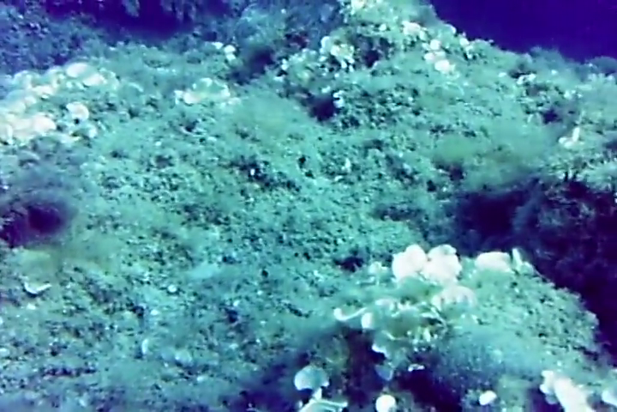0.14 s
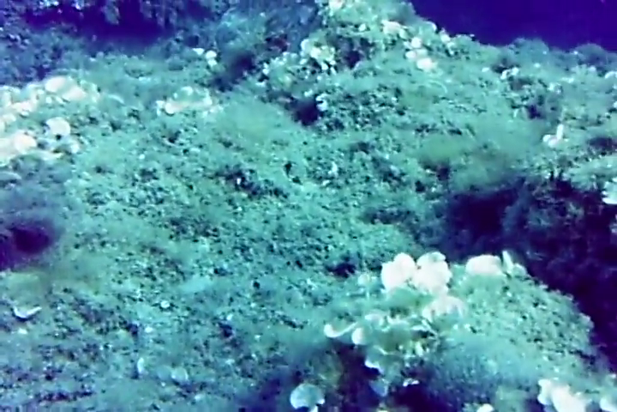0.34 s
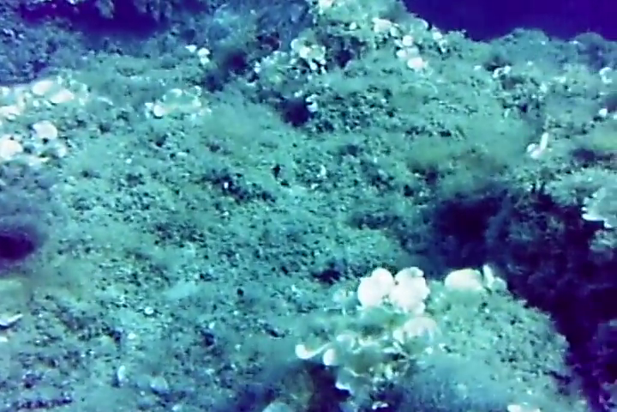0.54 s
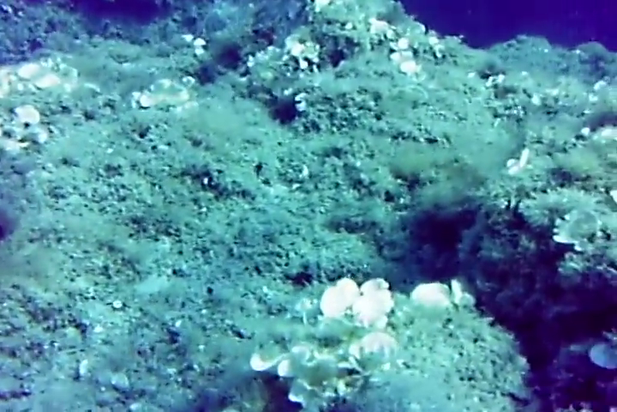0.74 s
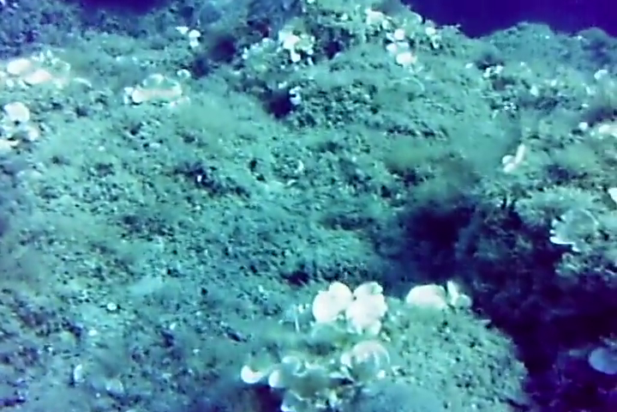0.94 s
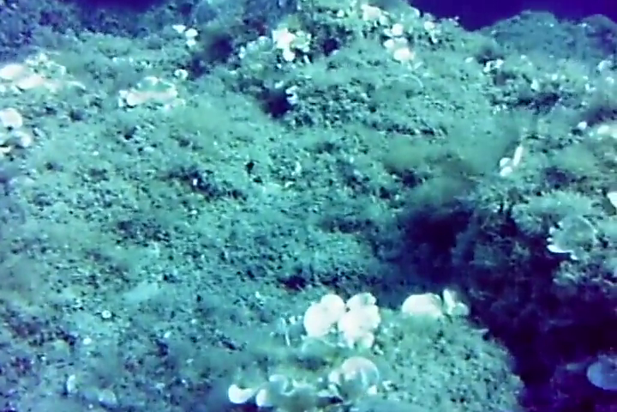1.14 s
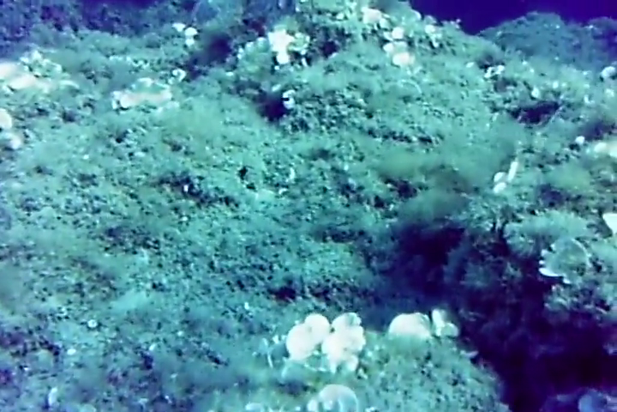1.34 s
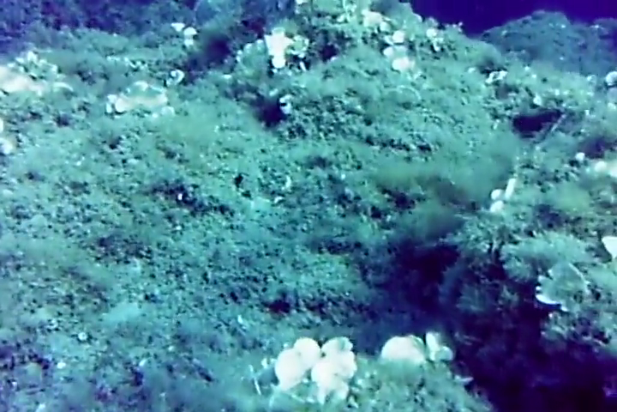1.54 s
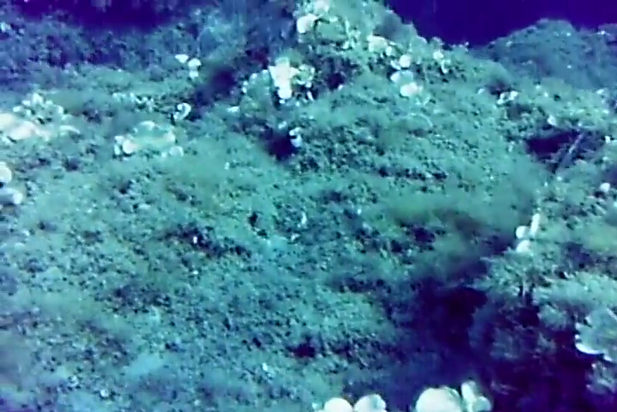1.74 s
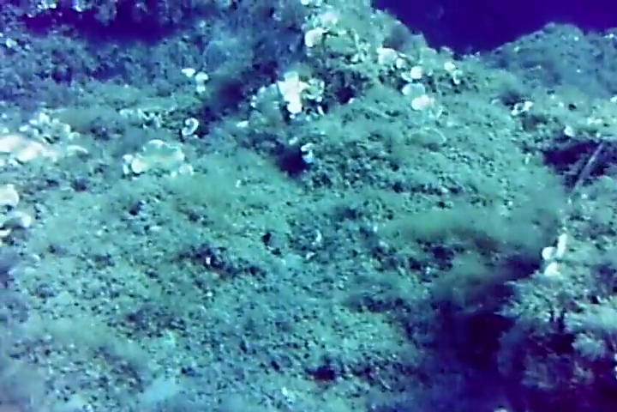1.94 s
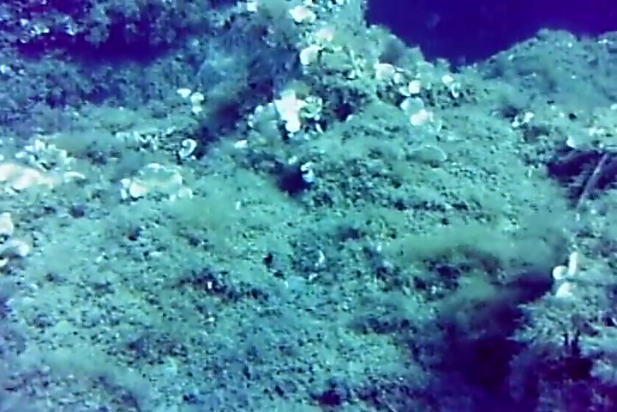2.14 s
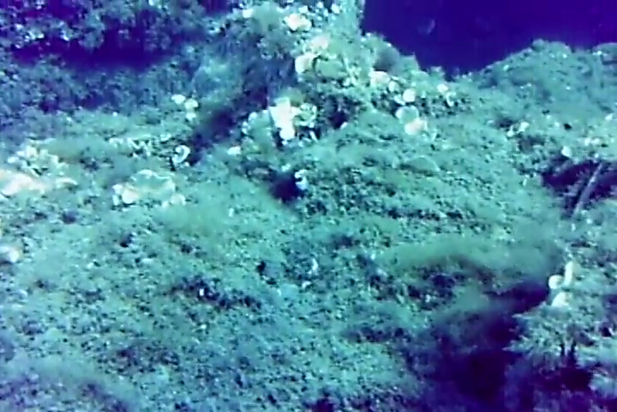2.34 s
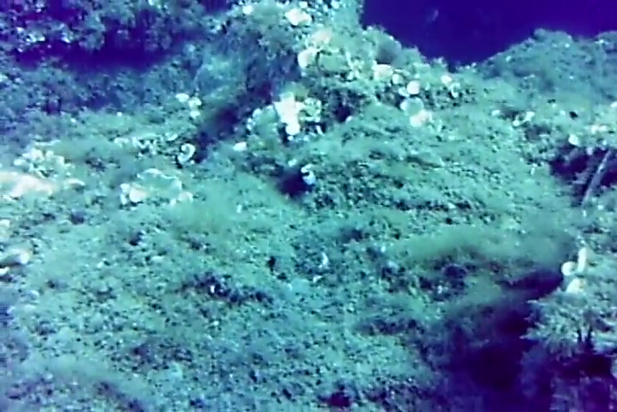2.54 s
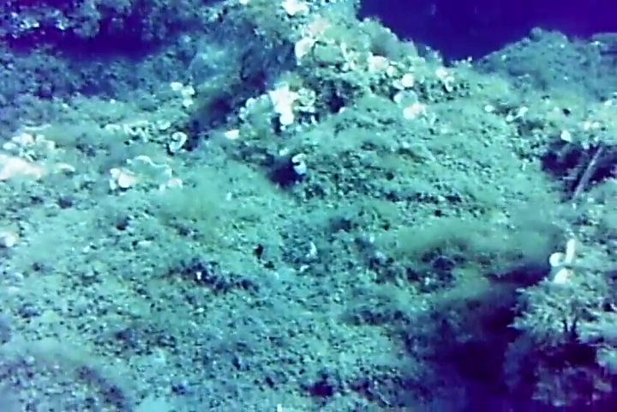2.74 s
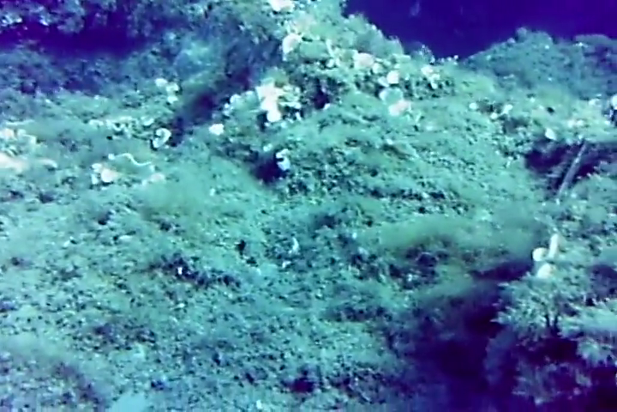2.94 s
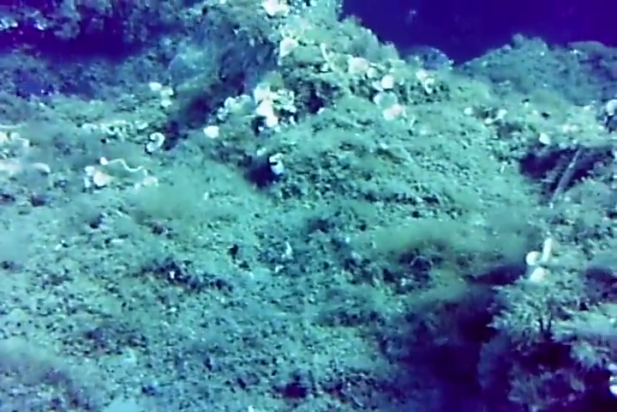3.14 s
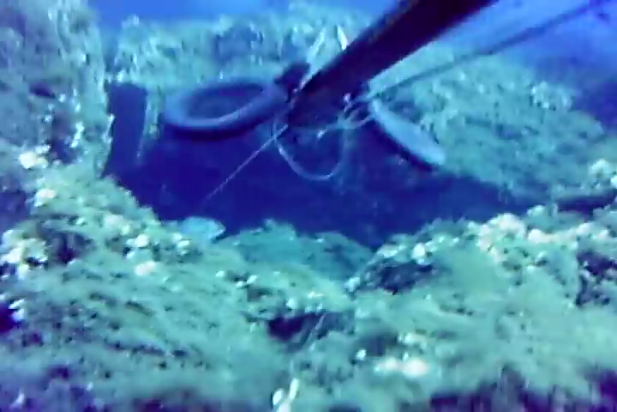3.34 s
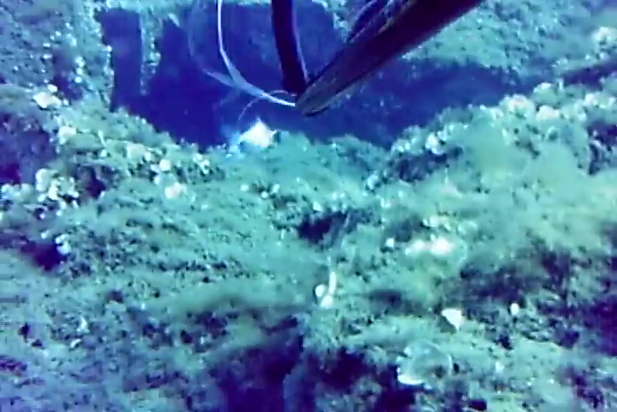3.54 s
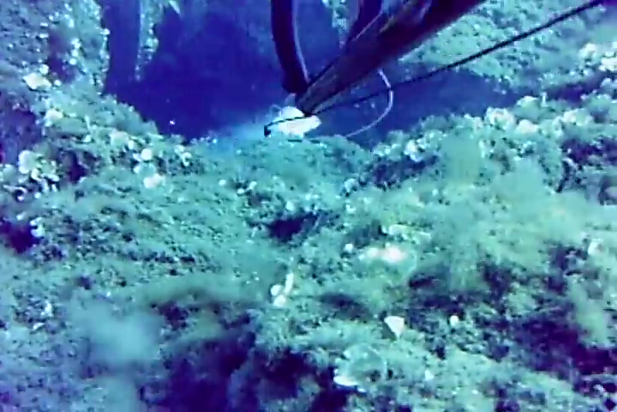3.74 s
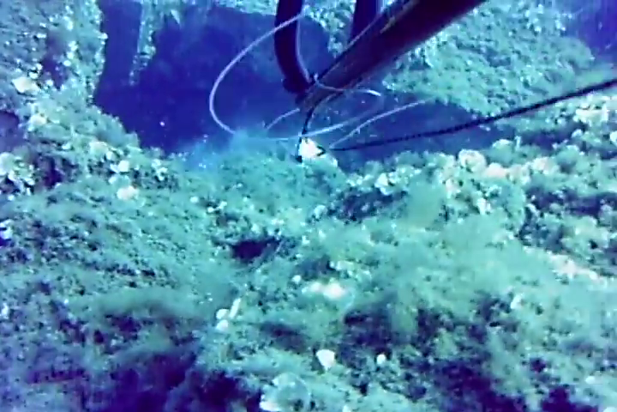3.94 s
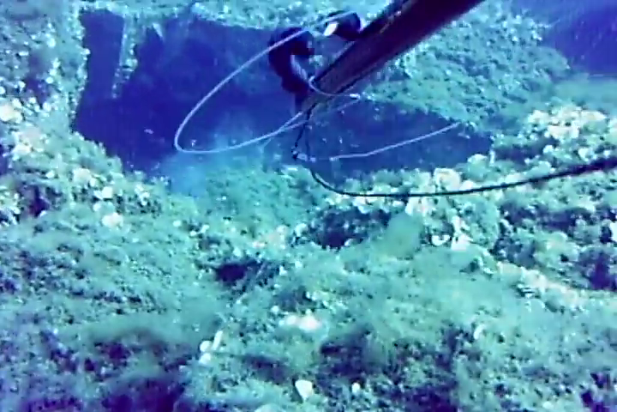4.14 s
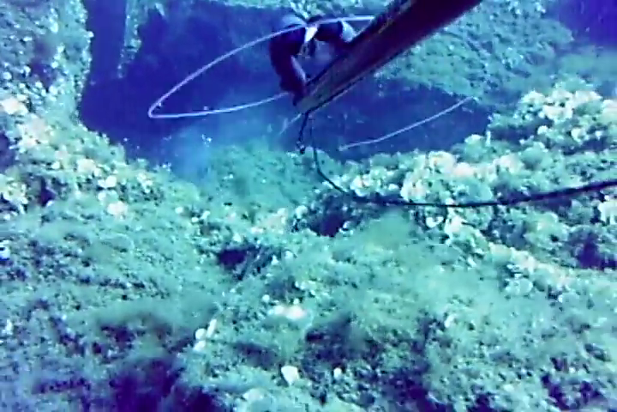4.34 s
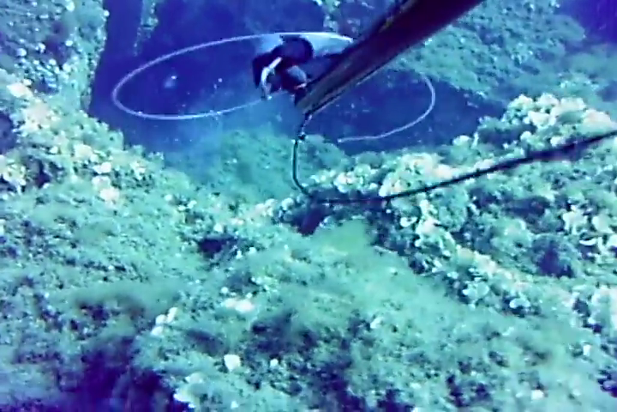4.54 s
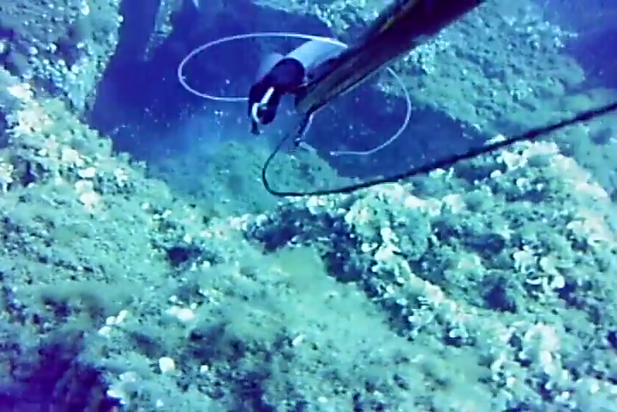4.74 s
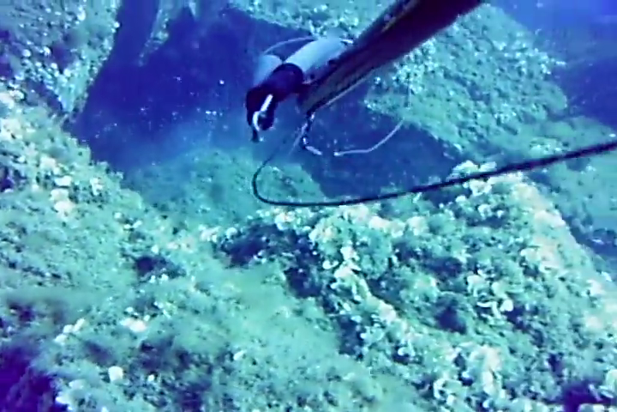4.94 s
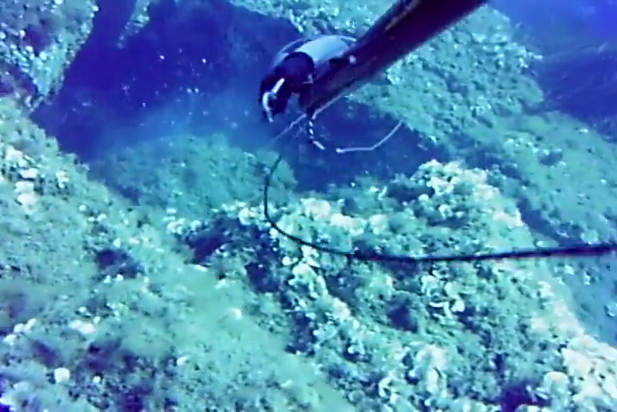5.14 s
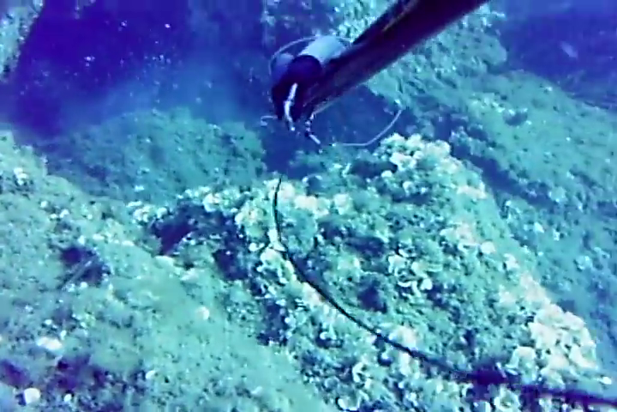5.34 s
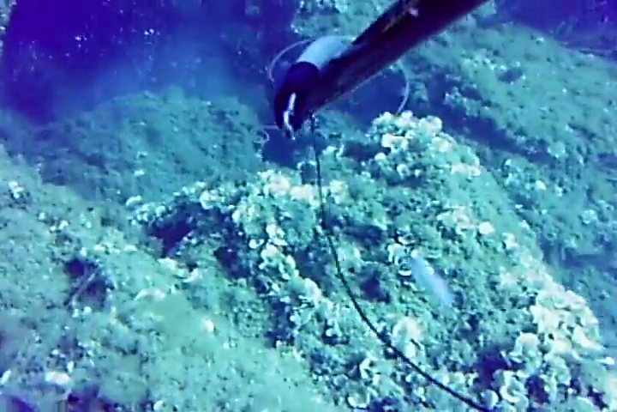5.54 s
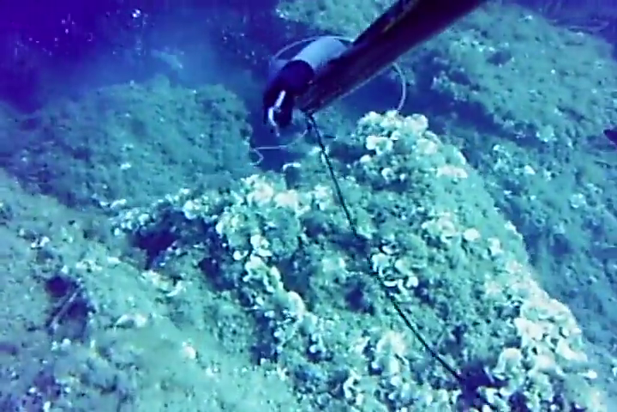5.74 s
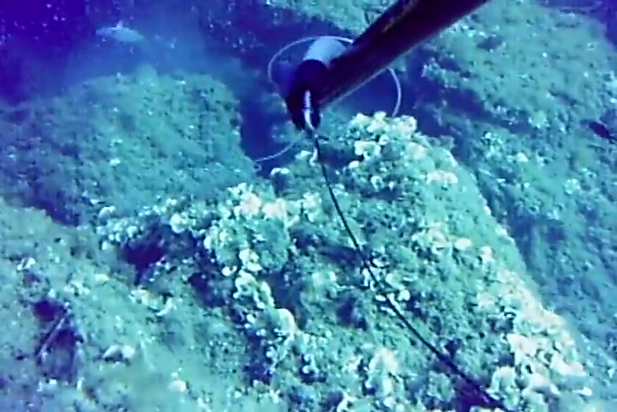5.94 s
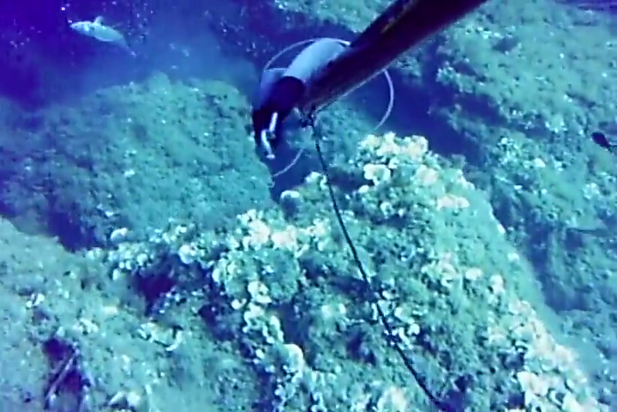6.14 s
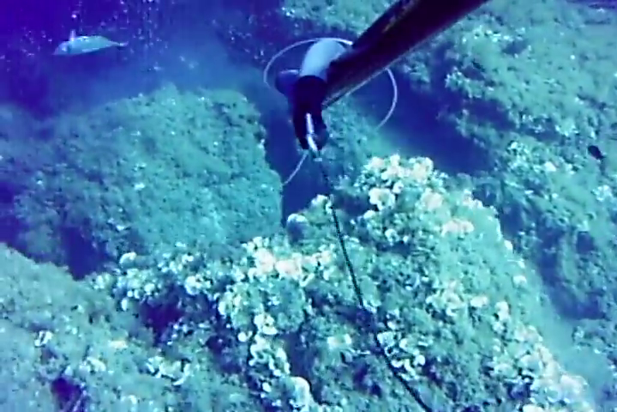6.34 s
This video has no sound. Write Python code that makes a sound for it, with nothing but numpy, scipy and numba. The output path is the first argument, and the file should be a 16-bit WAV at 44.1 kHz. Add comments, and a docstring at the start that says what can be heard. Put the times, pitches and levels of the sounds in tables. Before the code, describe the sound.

Over a reef underwater, thin buzzy circuit noise runs throughout, with a rougher patch each second. Sparse plastic clicks, clustered around one and a half seconds, precede a sudden harsh speargun discharge at about three. Its rumble dies quickly into hollow knocks, scratchy rubs and rapid rattles of loose gear, heard dry and narrow through the overloaded housing microphone.

```python
"""A spiky hiss throbs at the picture rate under faint whines: the circuits of a small camera in a plastic
housing, on a speargun over a reef. Short hard ticks excite the housing; slack gear rubs by stick and slip.
The shot, a noise roar through the body modes over a low thump, overloads the input and leaves a dying
rumble. Slack rubber and line knock, rattle and rub along barrel and housing, each blow a modal ring."""
import sys
import numpy as np
from scipy import signal
from scipy.fft import rfft, irfft
from scipy.io import wavfile
from scipy.ndimage import uniform_filter1d
from numba import njit

SR = 44100
rng = np.random.default_rng(int(sys.argv[2]) if len(sys.argv) > 2 else 0)


def field_ratio(decibels):
    """Amplitude ratio for a level in dB (20 dB per decade); scalars and array-likes work."""
    return 10 ** (np.asarray(decibels, dtype=float) / 20)


def unload_audio(sound):
    """Save the sound as a 16-bit wav file, at the path given as the first command line argument."""
    columns = np.transpose(np.atleast_2d(sound))
    # keep every value between -1 and 1, then stretch to whole-number steps
    steps = np.round(np.clip(columns, -1, 1) * 32767)
    wavfile.write(sys.argv[1], SR, steps.astype(np.int16))


N = 286209
T = np.arange(N) / SR

# Resonances of barrel and housing: (centre [Hz], nominal width [Hz]); each source scales the width
BODY_MODES = [(264, 40), (385, 90), (535, 44.6), (830, 182), (1190, 134), (1320, 52), (2250, 480),
              (2900, 320), (3700, 350)]
# Spectrum of the circuit hiss: (frequency [Hz], relative density [dB per Hz])
HISS_SPECTRUM = [(12, -43), (20, -9.5), (32, -23.5), (108, -24.5), (200, -28.5), (330, -28), (540, -25),
                 (700, -29), (1050, -29), (1280, -25), (1500, -29), (2100, -30.5), (2700, -29.5),
                 (3300, -28), (3800, -30.5), (5000, -44.5)]
# Clock whines: (frequency [Hz], nominal level [dB])
CLOCK_WHINES = [(506.0, -53.5), (689.1, -62), (753.7, -54), (823.6, -54.5), (1373, -57.5), (1475, -57.5),
                (1577, -51.5), (1685, -54.5), (1890, -56.5), (1997, -83.5), (2950, -60.5), (3160, -73),
                (3257, -52)]
# Hard ticks on the housing: (time [s], peak [dB], pitch [Hz], share of the wide snap [dB])
HOUSING_TICKS = [(.0408, -4, 3790, 4.5), (.608, -26, 3220, -8), (1.2448, -18, 2840, 3),
                 (1.301, -20.5, 3340, 2), (1.331, -16, 3020, 2), (1.338, -23, 3160, -10),
                 (1.495, -22, 2400, 5), (1.5165, -17, 2840, 1), (1.5534, -15.5, 2750, 5),
                 (1.5627, -23, 2930, -3), (1.5795, -5, 2500, 23), (1.65, -19, 3270, -1.5),
                 (1.6554, -20.5, 2900, -2), (1.6885, -3.5, 3750, 3.5), (1.6902, -15, 2830, -3),
                 (1.732, -18, 2840, 3.5), (2.188, -21.5, 2960, 1), (2.8414, -26, 2850, -5.5),
                 (3.1677, -8, 2320, -4.5), (3.3135, 2.5, 1870, 4.5), (3.3273, 1, 2290, -8),
                 (3.3782, -8.5, 2290, -12), (3.4186, -13.5, 2750, 3), (4.0507, -18.5, 3310, -4),
                 (4.058, -21, 3890, -4.5), (4.4864, -17.5, 3830, 0.5), (4.553, -20.5, 1860, -9),
                 (4.575, -18.5, 3860, -2), (4.627, -25, 2270, -6), (4.648, -24, 2310, -9),
                 (4.7601, -21.5, 3270, -6), (4.9516, -20, 2120, -4), (4.9921, -14, 1790, -9.5),
                 (5.0034, -18.5, 1850, -2.5), (5.0195, -20, 1840, -4), (5.0284, -17.5, 2220, -1),
                 (5.0444, -17, 2310, -11.5), (5.0534, -18.5, 2290, -5), (5.0724, -11.5, 2150, -8),
                 (5.0918, -14, 1820, -8.5), (5.0998, -13.5, 2220, -10), (5.1444, -29, 2270, -10),
                 (5.5822, -20.5, 2500, 3)]
# Drags of slack gear along the gun:
# (start [s], length [s], level [dB], tilt [dB per octave], extra of the main mode near 535 Hz [dB])
RUB_STROKES = [(1.477, 0.1, -43.5, 7, -10), (3.354, 0.055, -30, 5.5, 2), (3.423, .03, -26.5, -1, 5),
               (3.457, .14, -37.5, -6, 0), (3.652, .05, -39.5, -10, -1.5), (3.75, 1.21, -47.5, 1, 3.5),
               (3.826, 0.025, -45, -0.5, 7), (3.925, 0.076, -34.5, 1.5, 9.5), (4.06, 0.043, -31, 4, -7),
               (4.104, 0.031, -21, -2.5, -9.5), (4.15, 0.12, -38.5, -1, -7.5),
               (4.348, 0.044, -32, -1.5, -9), (4.48, 0.058, -31.5, 3, 2), (4.539, 0.053, -33.5, 2.5, -9),
               (4.589, .1, -33, 4, -7.5), (4.727, 0.097, -37.5, 3, 2.5), (4.862, 0.074, -39.5, 1, -16),
               (4.99, .12, -35, 3.5, -0.5), (5.205, 0.046, -44, -2, -0.5), (5.444, 0.046, -46.5, -3.5, 5),
               (5.706, 0.081, -43, 3, 1), (5.998, .07, -41.5, -4, 5), (6.072, 0.072, -31, -4, -8.5),
               (6.219, .105, -38, -6.5, -2), (6.334, .055, -35.5, -4, -3), (6.464, 0.055, -40.5, -0.5, -9)]
# Balance of the rub, one per body mode: level [dB]
RUB_BALANCE = [-8, -10, -3, -9, -3.5, -6, -11.5, -21, -20.5]
# Knocks of rubber and line on the barrel:
# (time [s], peak [dB], modes nearest the blow [Hz], least share of the main mode near 535 Hz [dB])
BARREL_KNOCKS = [(1.975, -25.5, 1250, 3), (3.169, -9, 1140, -7), (3.324, 5.5, 1250, -22),
                 (3.373, -6.5, 1250, -12), (3.424, -6.5, 1250, 2.5), (3.477, -9, 977, -17),
                 (3.527, -14.5, 796, -3), (3.57, -14, 840, -4), (3.616, -13, 880, -8.5),
                 (3.693, -20, 535, -2), (3.821, -13.5, 1090, -11.5), (4.075, -7.5, 264, -6),
                 (4.088, -11, 264, -22), (4.099, -15, 1280, -20), (4.106, -10, 535, -11),
                 (4.16, -13, 810, -25), (4.202, -16.5, 1100, -26), (4.293, -6.5, 1250, 1.5),
                 (4.355, -21.5, 1150, -13.5), (4.488, -16.5, 1250, -10.5), (4.55, -18, 1250, -20.5),
                 (4.593, -22, 1250, -21), (4.617, -14, 1150, -14), (4.632, -10, 1200, -23),
                 (4.646, -14.5, 1100, -19.5), (4.665, -12, 1220, -23), (4.676, -16.5, 1250, -25),
                 (4.775, -19, 1040, -20), (4.864, -26.5, 1250, -2), (4.891, -25.5, 1000, -8),
                 (4.989, -21.5, 1120, -17), (5.01, -14, 810, -8.5), (5.127, -7.5, 866, -11.5),
                 (5.136, -13.5, 830, -4), (5.202, -10, 915, -21), (5.208, -16, 888, -7),
                 (5.58, -11, 1206, -10), (5.591, -17.5, 945, -8), (5.995, -39, 500, 0),
                 (6.11, -20, 1250, -12), (6.225, -22.5, 1250, -27), (6.34, -19, 1250, -5.5),
                 (6.465, -32, 1250, -12)]
# Blows of the shot before overload: (time [s], level [dB], hold [s], fall [dB per s])
SHOT_BLOWS = [(3.193, 16.5, 0.055, 699.5), (3.257, 3.5, .018, 5003.5), (3.282, 10, .011, 2997.5),
              (3.295, -4, .027, 1999), (3.334, -13.5, 0.0198, 4000), (3.369, -13.5, 0.021, 547),
              (3.422, -24, 0.017, 2997)]
# Balance of the shot, one per body mode: level [dB]
SHOT_BALANCE = [-5.5, -2, 1, 1, 0.5, 1.5, -3.5, -14.5, -7.5]
# Band limit of the converter: (frequency [Hz], gain [dB])
CONVERTER_BAND = [(3500, 0), (3900, -2), (4050, -6), (4200, -15), (4400, -32), (4550, -80)]

PICTURES_HZ = 29.852
CONVERTER_HZ, FULL_SCALE = 8000, .722
SHOT_START_S = SHOT_BLOWS[0][0]


def unit(x):
    """Normalisation: scale a signal to rms 1."""
    return x / np.sqrt(np.mean(x ** 2))


def colour(x, points, floor_hz=5):
    """Linear filtering: shape a spectrum by (frequency [Hz], gain [dB]) points on a log axis."""
    hz, db = np.transpose(points)
    f = np.maximum(np.arange(len(x) // 2 + 1) * SR / len(x), floor_hz)
    gain = field_ratio(np.interp(np.log(f), np.log(hz), db))
    return irfft(rfft(x) * gain, len(x))


def ring(x, hz, width):
    """Resonance: two equal second-order peaks in series give steep skirts and gain 1 at the centre."""
    b, a = signal.iirpeak(min(hz, 4200), hz / width, SR)
    return signal.lfilter(b, a, signal.lfilter(b, a, x))


def walk(rate):
    """Slow modulation: random levels, one each 1 / rate s, joined by slews and scaled to rms 1."""
    k = int(SR / rate)
    held = np.repeat(rng.standard_normal(N // k + 1), k)
    return unit(uniform_filter1d(held, k)[:N])


def add(out, s, grain):
    """Superposition: mix a grain in at time s."""
    i = int(s * SR)
    out[i:i + len(grain)] += grain[:N - i]


@njit
def follower(x, attack, release):
    """Envelope detection: rise fast and fall slowly."""
    e, out = 0., np.empty(len(x))
    for i in range(len(x)):
        e += (abs(x[i]) - e) * (attack if abs(x[i]) > e else release)
        out[i] = e
    return out


def circuits():
    """Modulated noise: amplifier and water hiss rises with picture processing and card writing; clocks whine."""
    phase = T * PICTURES_HZ % 1
    busy = (phase > .09) & (phase < .42)
    picture = (T * PICTURES_HZ).astype(int)
    load_db = 4 + 1.3 * rng.standard_normal(int(N / SR * PICTURES_HZ) + 1)[picture]
    # random gain on three time scales makes the noise spiky
    spikes = rng.standard_normal(N) * field_ratio(3.0 * walk(900) + walk(60) + .6 * walk(3))
    hiss = unit(colour(unit(spikes) * field_ratio(busy * load_db), HISS_SPECTRUM)) * field_ratio(-38.5)

    # the memory card is written once a second
    write_from_s, write_s = -0.016, .22
    writing = uniform_filter1d(1. * ((T - write_from_s) % 1 < write_s), size=300)
    card_spectrum = [(150, -14.5), (500, 7.0), (1500, 5.0), (2500, -23.5), (4000, -3)]
    card = unit(colour(rng.standard_normal(N) * field_ratio(1.6 * walk(300)), card_spectrum))

    whine = 0
    for hz, db in CLOCK_WHINES:
        level = field_ratio(db - 1 + 2.0 * walk(3.6))
        whine = whine + level * np.sin(2 * np.pi * (hz * T + rng.random()))
    return hiss + field_ratio(-37.5) * writing * card + whine


def supply():
    """Bias shift: supply current steps inside each picture period, and a constant offset drifts."""
    phase = T * PICTURES_HZ % 1
    rise = np.exp(-((phase - .26) / .012) ** 2)
    dip = np.exp(-((phase - .42) / .022) ** 2)
    return -.052 + field_ratio(-43) * (rise - dip) + field_ratio(-57.5) * walk(7)


def ticks():
    """Stiff contact: a wide snap, a few rough cycles at its own pitch and a faint ring of upper housing modes."""
    contact_s, shorter_db_per_db = .0019, 0.82  # contact time shrinks as the snap grows
    out, t = np.zeros(N), T[:900]
    snap = np.sinc(CONVERTER_HZ * (t - 3e-4)) - 0.06 * np.exp(-t / 0.00089)
    noises = rng.standard_normal((len(HOUSING_TICKS), 900))
    for (s, db, hz, snap_db), noise in zip(HOUSING_TICKS, noises):
        length = contact_s * field_ratio(-shorter_db_per_db * snap_db)
        push = (t / length) * np.exp(-3.0 * t / length)
        cycles = ring(push * (np.sin(2 * np.pi * hz * t) + 1.6 * noise), hz, 0.57 * hz)
        click = cycles / np.abs(cycles).max() + field_ratio(snap_db) * snap
        click = click + 0.35 * sum(ring(click, f, 1.5 * w) for f, w in BODY_MODES[6:])
        add(out, s, field_ratio(db) * click / np.abs(click).max())
    return out


def stroke(s, length, edge):
    """Gating: a gain of 0-1 opens around s and closes around s + length, with edges of edge s."""
    return np.clip(np.minimum(T - s, s + length - T) / edge + .5, 0, 1)


def rub():
    """Stick and slip: uneven friction feeds the body modes, short grains on top and a smoother rumble below."""
    edge_s, brush_db = 0.018, -48.5  # stroke edges; faint brushing from the shot on
    slip_db, out = 3 * walk(140), 0
    drags = [stroke(s, length, edge_s) * field_ratio(db) for s, length, db, *_ in RUB_STROKES]
    for k, (db, (hz, width)) in enumerate(zip(RUB_BALANCE, BODY_MODES)):
        octaves = np.log2(hz / BODY_MODES[3][0])
        gain = field_ratio(brush_db) * (T > SHOT_START_S)
        for drag, (*_, tilt, main_db) in zip(drags, RUB_STROKES):
            gain = gain + drag * field_ratio(tilt * octaves + main_db * (k == 2))
        grain_db = min(hz / 1200, 1) * (slip_db + 1.9 * walk(150))
        wander_db = 1.5 * walk(30)  # modes come and go as the contact moves
        grains = rng.standard_normal(N) * field_ratio(grain_db + wander_db)
        out = out + field_ratio(db) * gain * unit(ring(grains, hz, 1.61 * width))
    # little of the rub reaches below about 200 Hz
    return colour(out, [(190, -20), (250, 0)])


def knocks():
    """Modal excitation: soft rubber presses for a few ms; where it lands sets the share of each body mode."""
    reach_db_per_oct, remote_db = 25.5, -24  # modes far from the blow fade, down to a floor
    out, t = np.zeros(N), T[:3000]
    centres = np.array([264, 535, 830, 1250])
    noises = rng.standard_normal((len(BARREL_KNOCKS), 3000))
    for (s, db, near_hz, main_db), noise in zip(BARREL_KNOCKS, noises):
        distance = np.abs(np.log2(centres / near_hz))
        low, mid, upper, high = np.maximum(-reach_db_per_oct * distance, remote_db)
        mid = max(mid, main_db)
        edge = max(upper, high) - 15
        shares = [low, low - 18, mid, upper, high, high - 2, edge, edge - 4]
        knock = 0
        for k, ((hz, width), share) in enumerate(zip(BODY_MODES, shares)):
            hz *= 1 + .03 * noise[k]  # the grip detunes every blow a little
            press_s = min(0.53 / width, max(.005, 3 / hz))  # narrow modes build up more slowly
            press = np.sin(np.pi * np.minimum(t / press_s, 1)) ** 2
            drive = press * (np.sin(2 * np.pi * hz * t) + 3.0 * noise)
            knock = knock + field_ratio(share) * unit(ring(drive, hz, 2.14 * width))
        add(out, s, field_ratio(db) * knock / np.abs(knock).max())
    return out


def shot():
    """Forced vibration: released rubber and spear hammer the barrel; every mode roars over a low thump."""
    attack_s, tail_s = 0.0012, .2
    force = 0
    for s, db, hold, fall in SHOT_BLOWS:
        decay = field_ratio(db - fall * np.clip(T - s - hold, 0, tail_s))
        force = force + decay * np.clip((T - s) / attack_s, 0, 1) * (T < s + hold + tail_s)
    bright = field_ratio(4) * np.clip(force, .05, 10) ** -0.22  # weaker blows are brighter
    modes = []
    for db, (hz, width) in zip(SHOT_BALANCE, BODY_MODES):
        swell = field_ratio(4 * walk(110))  # each mode swells and fades at random
        modes.append(field_ratio(db) * swell * unit(ring(rng.standard_normal(N), hz, 2.4 * width)))
    thump = field_ratio(-10) * unit(ring(rng.standard_normal(N), 110, 150))
    return force * unit(sum(modes[:6]) + thump + bright * sum(modes[6:]))


def recoil():
    """Damped sway: the gun moves in the water after the shot, a deep rumble that decays exponentially."""
    after = T - SHOT_START_S
    decay = (after > 0) * np.exp(-np.abs(after) / 0.15)
    return field_ratio(-24.0) * decay * unit(ring(rng.standard_normal(N), 45, 90))


def scene():
    """Superposition and gain control: circuit noise joins what the gun passes to the microphone."""
    sound = circuits() + ticks() + rub() + knocks() + shot() + recoil()
    # only peaks above 0.4 turn the gain down, in about 10 ms; it returns over about 0.3 s
    excess = np.maximum(np.minimum(np.abs(sound), 1) - .4, 0)
    over = follower(excess, 1 / (0.01 * SR), 1 / (.3 * SR))
    return (sound / (1 + 1.9 * over) + supply())[None]


def top_cut(x):
    """Nothing passes above the cut-off."""
    return signal.sosfilt(signal.butter(12, 15940, fs=SR, output="sos"), x)


def record(dry):
    """Sampling and clipping: a slow converter clips; at the higher rate its square tops overshoot and clip again."""
    count = 2 * round(N * CONVERTER_HZ / SR / 2)
    sampled = np.interp(np.arange(count) * N / count, np.arange(N), dry[0])
    slow = rfft(np.clip(sampled, -FULL_SCALE, FULL_SCALE))
    # the mirror image of the spectrum leaks a little past the band limit
    mirrored = irfft(np.r_[slow, np.conj(slow[-2::-1])], N) * N / count
    limited = colour(mirrored, CONVERTER_BAND)
    mix = np.clip(limited, -FULL_SCALE, FULL_SCALE)[None]
    return top_cut(mix)


dry = scene()
out = record(dry)
unload_audio(out)
```